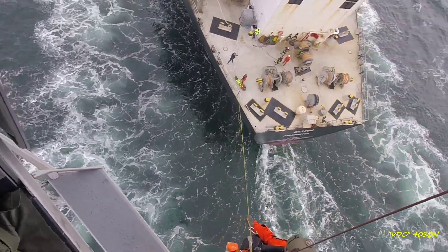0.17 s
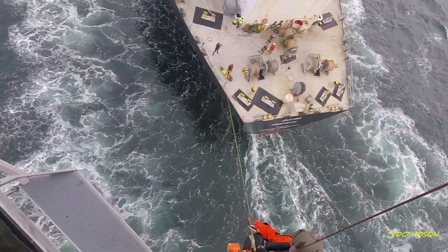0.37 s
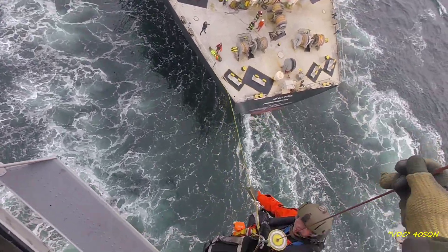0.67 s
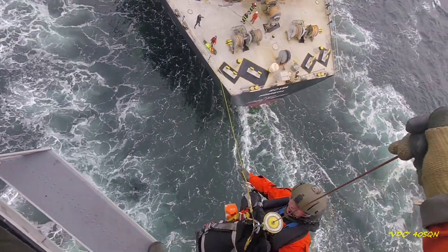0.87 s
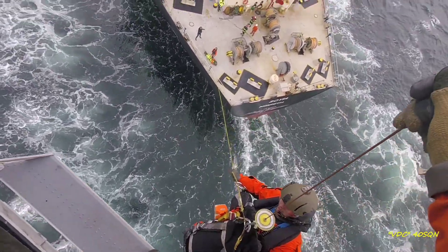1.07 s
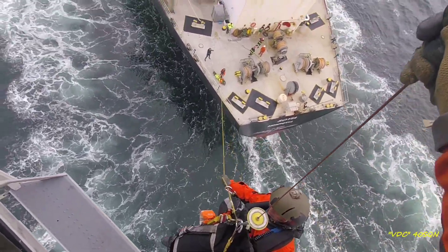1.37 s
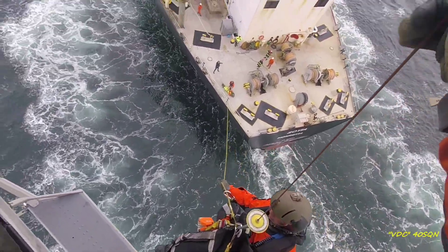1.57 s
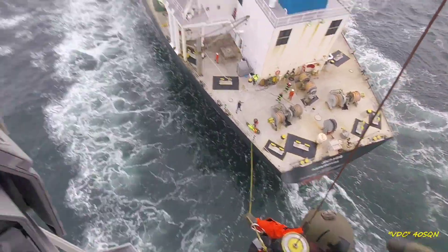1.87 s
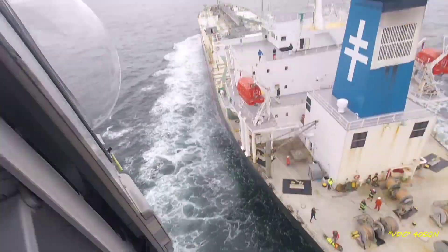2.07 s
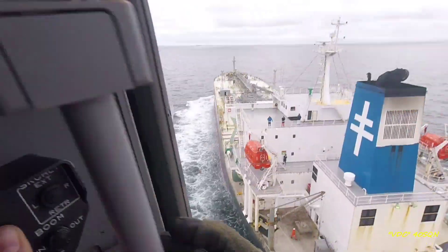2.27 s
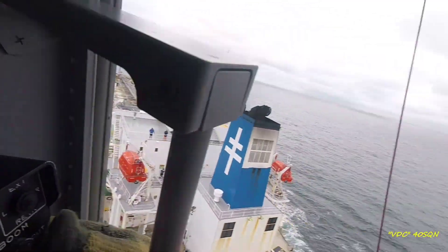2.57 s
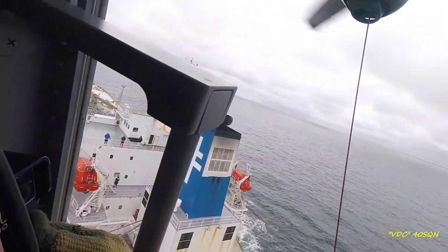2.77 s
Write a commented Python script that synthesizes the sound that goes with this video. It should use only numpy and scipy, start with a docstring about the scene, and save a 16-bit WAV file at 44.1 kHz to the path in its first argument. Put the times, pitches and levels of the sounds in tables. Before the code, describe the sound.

Helicopter roar at an open door, heavy wind buffeting, then droning cabin machinery and turbine whine

```python
"""Heavy wind buffeting comes first: rotor downwash at a hovering helicopter's open door, shaped noise with sharp slaps.
Behind it the tail rotor drones in harmonics, gears sing as wavering tones, and the engines roar and hiss as noise.
The turbine whines near 10.8 kHz; every main blade bends it into a falling chirp of narrow gliding noise.
Near 2 s the microphone turns into the cabin: the buffeting drops, drone and gear tones come forward,
then the wind rush returns."""
import sys
import numpy as np
from scipy import signal
from scipy.fft import rfft, irfft, next_fast_len
from scipy.io import wavfile
from scipy.ndimage import uniform_filter1d, minimum_filter1d

SR = 44100
rng = np.random.default_rng(int(sys.argv[2]) if len(sys.argv) > 2 else 0)


def bounce(signal):
    """Save signal as a 16-bit WAV file at the path given by the first command-line argument."""
    frames = np.transpose(np.atleast_2d(signal))
    limited = np.clip(frames, -1, 1)
    pcm = np.round(limited * 32767).astype(np.int16)
    wavfile.write(sys.argv[1], SR, pcm)


N = 128331
T = np.arange(N) / SR

BLADE_HZ, TAIL_HZ = 17.77, 85.35  # main blade passages and tail rotor blade passages
TURN_START_S, TURN_END_S = 1.37, 2.2  # the faint gear tones cross from door to cabin level

# Deep wind rumble on the microphone: (time [s], level [dB])
RUMBLE_LEVEL = [(0, -17), (.22, -25), (.45, -17), (.65, -17), (.8, -18), (1.25, -22), (1.5, -19),
                (1.62, -16.5), (1.76, -18), (1.86, -11.5), (1.98, -18.5), (2.08, -29), (2.45, -35),
                (2.7, -33), (2.9, -32)]
# Wind buffeting on the microphone: (time [s], level [dB])
BUFFET_LEVEL = [(0, -11), (.1, -14), (.2, -11), (.63, -14.5), (.78, -12), (1.1, -11.5), (1.5, -13.5),
                (1.77, -11), (1.86, -22), (2.05, -37), (2.3, -34), (2.55, -20.5), (2.9, -24)]
# Wind rush at the door, ahead of a small trim: (time [s], level [dB])
RUSH_LEVEL = [(0, -25), (.1, -26), (.19, -21), (.3, -18), (.55, -19.5), (.8, -17.5), (1.05, -18),
              (1.28, -17.5), (1.45, -18.5), (1.62, -17), (1.8, -21), (1.88, -34), (2.1, -37.5), (2.35, -25),
              (2.65, -18), (2.9, -23)]
# Draught in the cabin: (time [s], level [dB])
DRAUGHT_LEVEL = [(0, -60), (2.0, -47), (2.18, -31), (2.35, -23), (2.5, -17.5), (2.68, -16), (2.82, -14),
                 (2.9, -15)]
# Rumble spectrum: (frequency [Hz], relative density [dB per Hz])
RUMBLE_SPECTRUM = [(15, -12), (24, -9), (31, 0.5), (42, -4), (52, 4), (65, -10), (100, -15)]
# Buffeting spectrum: (frequency [Hz], relative density [dB per Hz])
BUFFET_SPECTRUM = [(30, -42), (48, -2.5), (68, 1), (95, -1.5), (130, -3), (180, -9.5), (260, -22),
                   (500, -41)]
# Rush spectrum before its flutter: (frequency [Hz], relative density [dB per Hz])
RUSH_SPECTRUM = [(90, -18), (160, 0.5), (250, 0.5), (400, -2.5), (630, -8), (1000, -14), (1500, -21.5),
                 (2200, -27), (4000, -45), (8000, -67)]
# Draught spectrum before its flutter: (frequency [Hz], relative density [dB per Hz])
DRAUGHT_SPECTRUM = [(140, -2.5), (220, 2), (330, 3.5), (450, -5), (700, -5.5), (1000, -9), (1350, -20),
                    (2100, -24.5), (3000, -29), (5000, -37)]
RUSH_TRIM_DB, RUSH_SPLIT_HZ = 0.27, 380
RUSH_FLUTTER_DB, RUSH_LUMP_DB, LOW_EDDY_DB, DRAUGHT_FLUTTER_DB = 2, 1.5, 3, 1.3

# Sharp slaps of air: (time [s], thud level [dB], crack level [dB])
SLAP_HITS = [(0.023, -18, -37), (0.217, -17, -27), (.348, -25, -26.5), (.364, -14, -21.5), (.505, -22, -25),
             (.746, -30, -24.5), (.836, -20, -30.5), (0.956, -13, -30), (1.145, -23, -23.5),
             (1.275, -19, -40), (1.3, -22, -26.5), (1.484, -17, -28), (1.618, -15, -31), (1.795, -19, -25)]
# Thud spectrum: (frequency [Hz], relative density [dB per Hz])
THUD_SPECTRUM = [(150, -4), (400, 0.5), (900, -2.5), (1600, -12), (3000, -30)]
# Crack spectrum: (frequency [Hz], relative density [dB per Hz])
CRACK_SPECTRUM = [(900, 0), (1900, 1), (3000, -6.5), (4500, -15.5), (8000, -15)]
SLAP_S = 0.0021  # standard deviation of the bell-shaped envelope

# Brief high swish during the turn: (time [s], level [dB])
SWISH_LEVEL = [(1.8, -70), (1.95, -35), (2.03, -36), (2.1, -38), (2.18, -46), (2.35, -70)]
# Swish spectrum: (frequency [Hz], relative density [dB per Hz])
SWISH_SPECTRUM = [(7500, -19), (9300, 1), (10400, 4), (11200, -4), (12200, -16), (13500, -24)]

# Machinery roar: (time [s], level [dB])
ROAR_LEVEL = [(0, -26.5), (1.7, -27.5), (2.0, -23.5), (2.2, -22), (2.45, -21.5), (2.9, -24.5)]
# Roar spectrum: (frequency [Hz], relative density [dB per Hz])
ROAR_SPECTRUM = [(60, -4), (115, 4.5), (155, 8.5), (210, -8), (320, -7), (600, -7.5), (950, -11.5),
                 (1350, -10), (1700, -17.5), (2400, -21), (3000, -21.5), (3700, -28), (4700, -27.5),
                 (6000, -61)]
# Turbine hiss at the door, around which it flickers: (time [s], level [dB])
DOOR_HISS_LEVEL = [(0, -37), (1.1, -34.5), (1.8, -35.5), (2.05, -36.5), (2.25, -37.5), (2.5, -36.5),
                   (2.9, -41)]
# Door hiss spectrum: (frequency [Hz], relative density [dB per Hz])
DOOR_HISS_SPECTRUM = [(3500, -32), (4700, -5.5), (5400, 3.5), (5900, -1), (6500, 1.5), (7500, 2), (9000, 1),
                      (10200, 1), (11000, -8), (11800, -16), (13000, -30)]
# Turbine hiss in the cabin, around which it flickers: (time [s], level [dB])
CABIN_HISS_LEVEL = [(0, -55), (1.8, -45), (2.1, -37.5), (2.42, -35.5), (2.65, -32), (2.9, -34.5)]
# Cabin hiss spectrum: (frequency [Hz], relative density [dB per Hz])
CABIN_HISS_SPECTRUM = [(3000, -17), (4700, -13), (5500, 2), (5950, -1), (6700, 3), (7600, 2), (8600, -8),
                       (9700, -13), (11500, -33)]

# Centre pitches of the faint gear tones: (frequency [Hz])
FAINT_GEAR_HZ = [613.7, 2121, 3408, 3763, 5556, 6358, 6767]
# Levels of those tones in the same order: (level at the door [dB], level in the cabin [dB])
FAINT_GEAR_DB = [(-40.5, -32.5), (-74, -47), (-63.5, -58), (-73, -53.5), (-53, -51), (-56, -45.5),
                 (-65, -56)]
# Low gearbox howl, each of two tones: (time [s], level [dB])
HOWL_LEVEL = [(0, -53), (.5, -43), (.9, -42), (1.4, -44.5), (1.7, -51), (1.92, -36.5), (2.15, -43.5),
              (2.33, -36.5), (2.55, -52), (2.9, -54)]
# Close pair of gear tones, each: (time [s], level [dB])
PAIR_LEVEL = [(0, -52), (.9, -56), (1.15, -49), (1.7, -54), (1.95, -44), (2.14, -51), (2.36, -43),
              (2.6, -48), (2.9, -47)]
# Ringing gear tone: (time [s], level [dB])
RING_LEVEL = [(0, -69), (.25, -52), (.7, -63), (1.15, -52), (1.7, -57), (2.3, -55), (2.6, -43),
              (2.82, -39.5), (2.9, -48)]
# Whistling gear tone: (time [s], level [dB])
WHISTLE_LEVEL = [(0, -43), (.15, -48), (.3, -57), (1.4, -55), (1.88, -44), (1.98, -33), (2.08, -40),
                 (2.2, -40), (2.3, -32), (2.38, -45), (2.44, -32.5), (2.53, -45), (2.9, -39)]
# High gear tone: (time [s], level [dB])
HIGH_LEVEL = [(0, -46), (.85, -55), (1.1, -46), (1.5, -54), (2.22, -47), (2.31, -35), (2.44, -37),
              (2.62, -50), (2.73, -33), (2.9, -49)]
# Highest gear tone: (time [s], level [dB])
TOP_LEVEL = [(0, -62), (2.3, -56), (2.44, -43), (2.56, -52), (2.72, -37), (2.9, -53)]
HOWL_HZ, PAIR_HZ = (1345, 1416), (3025, 3133)
RING_HZ, WHISTLE_HZ, HIGH_HZ, TOP_HZ = 4307, 6272, 7337, 8619
# Rate of the random swing, and the share of power it takes
GEAR_WIDTH_HZ, GEAR_WAVER = 12, 0.62
HOWL_WIDTH_HZ, HOWL_WAVER = 45, 0.92
STRONG_WIDTH_HZ, STRONG_WAVER = 27, 0.31
GEAR_WOBBLE = 0.001103  # relative pitch wobble as the microphone sways

# Steady turbine whine: (time [s], level [dB])
WHINE_LEVEL = [(0, -41.5), (1.0, -39), (1.85, -35.5), (2.05, -33.5), (2.28, -36), (2.4, -43), (2.9, -43)]
# Blade chirps, added to the level within each passage: (time [s], level [dB])
CHIRP_LEVEL = [(0, -37), (.7, -34.5), (1.3, -30.5), (1.88, -29.5), (2.02, -34), (2.18, -37), (2.4, -48),
               (2.9, -54)]
# One blade passage: (share of the cycle [0-1], centre frequency [Hz], relative level [dB])
BLADE_PASSAGE = [(0, 10670, -23), (.19, 10640, -25), (.31, 10730, -0.5), (.44, 10780, 3.5),
                 (.57, 10500, -1.5), (.73, 10190, -1), (.87, 10040, -29), (1, 9830, -22)]
WHINE_HZ, WHINE_WIDTH_HZ, WHINE_WAVER = 10764, 91, 0.91
CHIRP_SPREAD_HZ, CHIRP_VARY_DB, CHIRP_JITTER_S = 350, 1.5, 0.002

# Tail rotor drone: (time [s], level [dB])
DRONE_LEVEL = [(0, -18), (1.75, -23), (1.95, -20), (2.1, -19), (2.25, -16.5), (2.42, -14.5), (2.6, -11),
               (2.78, -9), (2.9, -14)]
# Drone harmonics: (multiple of the tail rotor pitch, relative level [dB])
DRONE_HARMONICS = [(1, 0), (2, -21), (3, -19), (4, -20.5), (5, -32)]
THROB_DB = -34.5  # main rotor throb at twice the blade rate

# Recorder: the treble is mirrored about half of MIRROR_HZ
MIRROR_HZ, MIRROR_DB = 24000, -9.5
CEILING, LIMITER_DB_PER_S, CUTOFF_HZ = 0.79, 152, 15000  # limiter threshold, its release, top cut


def from_db(db):
    """Decibels to gain."""
    return 10 ** (np.asarray(db) / 20)


def rms_one(x):
    """Scale to unit power."""
    return x / np.sqrt(np.mean(np.abs(x) ** 2) + 1e-20)


def level(rows):
    """Gain over time from (time [s], level [dB]) rows."""
    return from_db(np.interp(T, *np.transpose(rows)))


def drift(rate_hz):
    """Slow random motion with spread 1: noise through two equal poles at an eighth of the sample rate."""
    pole = np.exp(-16 * np.pi * rate_hz / SR)
    white = rng.standard_normal(N // 8 + 4002)
    slow = signal.lfilter([1], [1, -2 * pole, pole * pole], white)[4000:]  # drop the filter's start-up
    return np.interp(np.arange(N) / 8, np.arange(len(slow)), rms_one(slow))


def noise(spectrum):
    """Noise of unit power with the given spectrum, falling away beyond its ends."""
    hz, db = np.transpose(spectrum)
    size = next_fast_len(N)
    f = np.maximum(np.arange(size // 2 + 1) * SR / size, 1)
    gain = from_db(np.interp(np.log(f), np.log(hz), db))
    gain = gain * np.minimum(1, f / hz[0]) ** 2 * np.minimum(1, hz[-1] / f) ** 2
    return rms_one(irfft(rfft(rng.standard_normal(size)) * gain, size)[:N])


def tone(hz, width_hz, waver):
    """A tone of unit power; waver is the share of it that turbulent air scatters."""
    waver = np.clip(waver, 0, 1)
    scatter = drift(width_hz) + 1j * drift(width_hz)
    swing = np.sqrt(1 - waver) + np.sqrt(waver / 2) * scatter
    cycles = np.cumsum(hz + np.zeros(N)) / SR + rng.random()
    return rms_one(np.real(swing * np.exp(2j * np.pi * cycles)))


def steadied(x, window_s, share):
    """Even out the slow swells of a noise by dividing out a share of its smoothed envelope."""
    size = max(int(window_s * SR), 2)
    power = np.abs(signal.hilbert(x, next_fast_len(N))[:N]) ** 2
    power = uniform_filter1d(uniform_filter1d(power, size), size) + 1e-9
    return rms_one(x / power ** (np.clip(share, 0, 1) / 2))


def wind():
    """Downwash: rumble, buffeting, a rush fluttering with large and small eddies, and the cabin draught."""
    rumble = steadied(noise(RUMBLE_SPECTRUM), 0.027, 0.62)
    buffet = steadied(noise(BUFFET_SPECTRUM), 0.022, 0.88)

    # The buffeting's own waveform also modulates the rush
    eddies = rms_one(from_db(RUSH_FLUTTER_DB * drift(59) - RUSH_LUMP_DB * buffet))
    air = noise(RUSH_SPECTRUM)
    split = signal.butter(2, RUSH_SPLIT_HZ, fs=SR, output="sos")
    low = signal.sosfiltfilt(split, air)
    low_eddies = rms_one(from_db(LOW_EDDY_DB * drift(47)))
    rush = steadied((low * low_eddies + air - low) * eddies, 0.048, 0.79)

    flutter = from_db(DRAUGHT_FLUTTER_DB * drift(83))
    draught = steadied(noise(DRAUGHT_SPECTRUM) * flutter, 0.06, 0.42)

    at_door = level(RUMBLE_LEVEL) * rumble + level(BUFFET_LEVEL) * buffet
    at_door = at_door + from_db(RUSH_TRIM_DB) * level(RUSH_LEVEL) * rush
    return at_door + level(DRAUGHT_LEVEL) * draught


def slaps():
    """Single eddies hit the microphone, each a short bell-shaped burst with a thud and a crack."""
    thud, crack = noise(THUD_SPECTRUM), noise(CRACK_SPECTRUM)
    total = np.zeros(N)
    for hit_s, thud_db, crack_db in SLAP_HITS:
        burst = np.exp(-((T - hit_s) / SLAP_S) ** 2 / 2)
        total += burst * (from_db(thud_db) * thud + from_db(crack_db) * crack)
    return total


def swish():
    """A brief high swish: a band of treble noise that swells and fades during the turn."""
    return level(SWISH_LEVEL) * noise(SWISH_SPECTRUM)


def engines():
    """Broad machinery roar and flickering turbine hiss, both as shaped noise."""
    door_hiss = level(DOOR_HISS_LEVEL) * noise(DOOR_HISS_SPECTRUM)
    cabin_hiss = level(CABIN_HISS_LEVEL) * noise(CABIN_HISS_SPECTRUM)
    flicker = from_db(1.1 * drift(30))
    return (door_hiss + cabin_hiss) * flicker + level(ROAR_LEVEL) * noise(ROAR_SPECTRUM)


def gearbox():
    """Meshing gears: faint tones that grow into the cabin, a wavering howl and swelling whistles."""
    inside = np.interp(T, [TURN_START_S, TURN_END_S], [0, 1])
    sway = 1 + GEAR_WOBBLE * drift(5.06)
    total = np.zeros(N)
    for hz, (door_db, cabin_db) in zip(FAINT_GEAR_HZ, FAINT_GEAR_DB):
        gain = from_db(door_db + (cabin_db - door_db) * inside)
        total += gain * tone(hz * sway, GEAR_WIDTH_HZ, GEAR_WAVER)
    for hz in HOWL_HZ:
        total += level(HOWL_LEVEL) * tone(hz, HOWL_WIDTH_HZ, HOWL_WAVER)
    strong = [(hz, PAIR_LEVEL) for hz in PAIR_HZ]
    strong += [(RING_HZ, RING_LEVEL), (WHISTLE_HZ, WHISTLE_LEVEL), (HIGH_HZ, HIGH_LEVEL), (TOP_HZ, TOP_LEVEL)]
    for hz, curve in strong:
        total += level(curve) * tone(hz * sway, STRONG_WIDTH_HZ, STRONG_WAVER)
    return total


def turbine():
    """A shrill whine; each passing blade adds a blurred reflection that falls in pitch."""
    share, hz, db = np.transpose(BLADE_PASSAGE)
    cycle = (T + CHIRP_JITTER_S * drift(8.4)) * BLADE_HZ % 1

    # Low-passed complex noise becomes a narrow band around the gliding pitch
    white = rng.standard_normal(N) + 1j * rng.standard_normal(N)
    blur = signal.sosfilt(signal.butter(4, CHIRP_SPREAD_HZ, fs=SR, output="sos"), white)
    cycles = np.cumsum(np.interp(cycle, share, hz)) / SR
    glide = rms_one(np.real(blur * np.exp(2j * np.pi * cycles)))

    chirps = glide * from_db(np.interp(cycle, share, db) + CHIRP_VARY_DB * drift(25))
    whine = tone(WHINE_HZ, WHINE_WIDTH_HZ, WHINE_WAVER)
    return level(CHIRP_LEVEL) * chirps + level(WHINE_LEVEL) * whine


def rotors():
    """The tail rotor's drone, its overtones wavering more as they rise, over the main rotor's deep throb."""
    drone = np.zeros(N)
    for order, db in DRONE_HARMONICS:
        drone += from_db(db) * tone(order * TAIL_HZ, 4.8, 0.0089 * order * order)
    throb = from_db(THROB_DB) * tone(2 * BLADE_HZ, 4.4, 0.3)
    return level(DRONE_LEVEL) * drone + throb


def scene():
    """Everything at the microphone, in one channel."""
    mix = wind() + slaps() + swish() + engines() + gearbox() + turbine() + rotors()
    return mix[None]


def record(dry):
    """The recorder adds a mirror image of the top treble, limits the peaks and cuts the top."""
    top = signal.sosfilt(signal.butter(6, 10500, "high", fs=SR, output="sos"), dry[0])
    mirrored = np.real(signal.hilbert(top) * np.exp(-2j * np.pi * MIRROR_HZ * T))
    x = dry[0] + from_db(MIRROR_DB) * mirrored

    # Each overshoot is held and released at a constant slope, then the gain is smoothed around it
    over_db = 20 * np.log10(np.maximum(np.abs(x) / CEILING, 1))
    release_db = LIMITER_DB_PER_S * T
    held_db = np.maximum.accumulate(over_db + release_db) - release_db
    gain_db = uniform_filter1d(minimum_filter1d(-held_db, size=65), size=65)
    x = x * from_db(gain_db)

    return signal.sosfilt(signal.cheby2(16, 60, CUTOFF_HZ, fs=SR, output="sos"), x)[None]


dry = scene()
out = record(dry)
bounce(out)
```